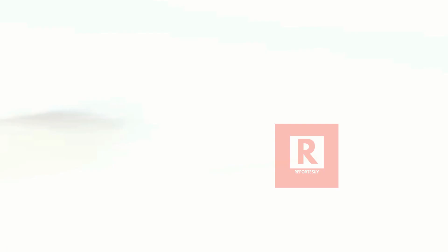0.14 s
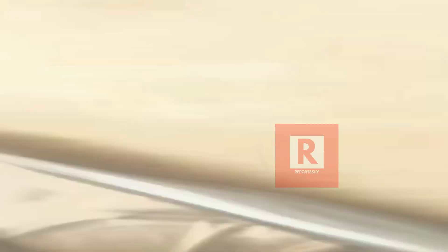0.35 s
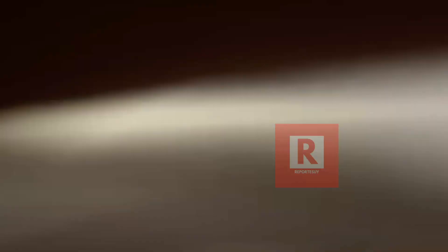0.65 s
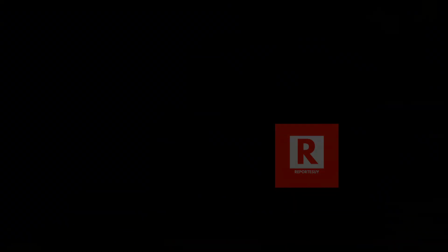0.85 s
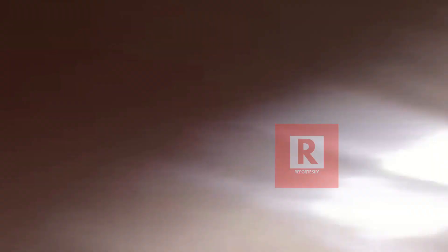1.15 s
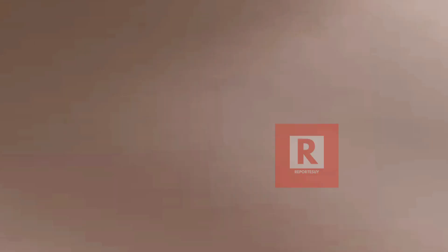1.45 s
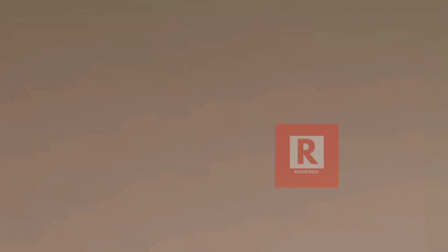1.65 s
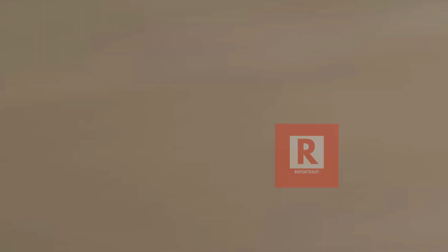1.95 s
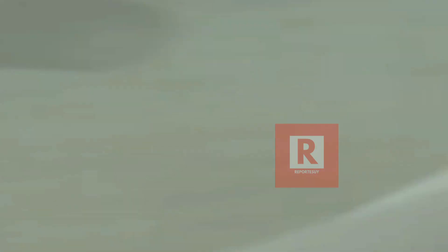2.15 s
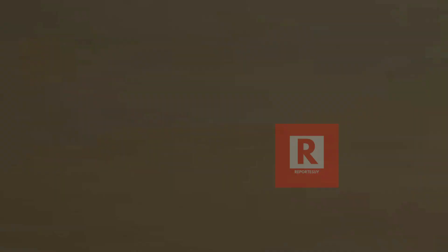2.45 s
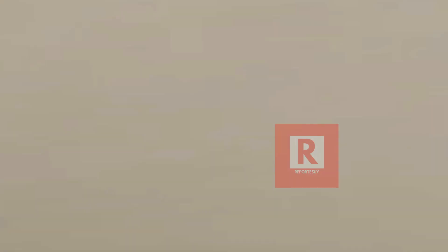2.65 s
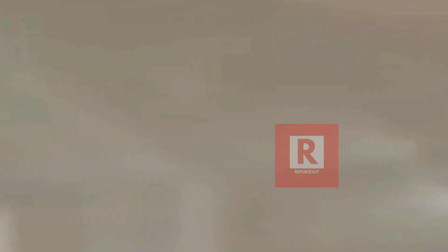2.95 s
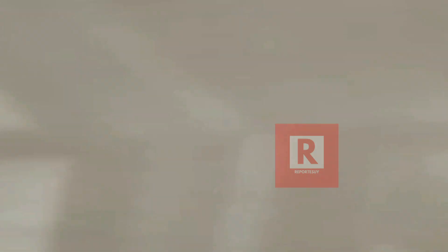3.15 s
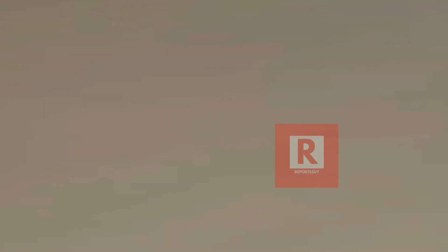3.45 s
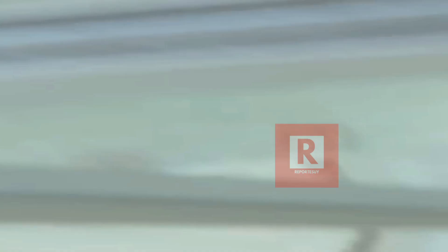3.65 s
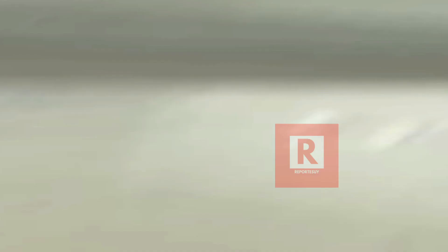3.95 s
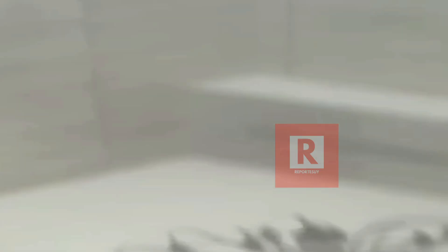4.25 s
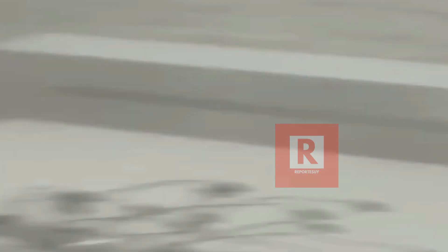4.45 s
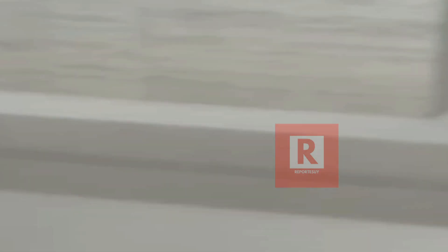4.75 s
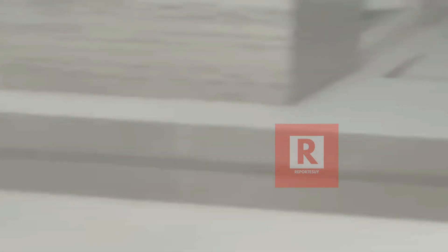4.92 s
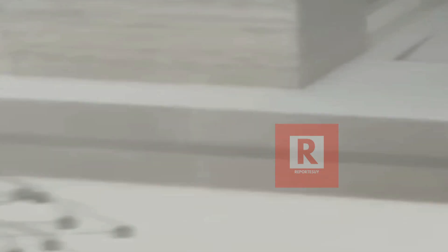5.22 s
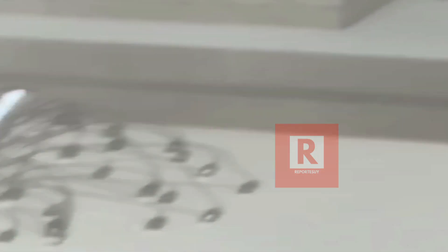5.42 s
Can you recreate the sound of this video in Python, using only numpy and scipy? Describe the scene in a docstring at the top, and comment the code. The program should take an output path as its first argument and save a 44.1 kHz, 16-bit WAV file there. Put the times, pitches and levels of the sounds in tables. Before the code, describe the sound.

The shock wave strikes a room without any lead-in, a flattened, distorted barrage of knocks, cracks and roaring crunch. Within a second it breaks into sliding rubble and hollow wind-like air; another collapse and few shards of glass follow before two seconds. Deep shaking lingers, with distant muffled knocks and a late small clatter near four and a half seconds. Wide stereo, bass centred, no extreme treble.

```python
"""Inside a building that a huge blast has just struck, heard in widened stereo.
Swaying room modes, noise echoes and damped knocks form the deep rumble, roar and crunch that die away.
Rubble, dust and hail are random impulses turned to coloured noise; heavy pieces are cracks with dying noise.
Glass shards ring as damped sines, air rushes past as opposed noise bands, and a faint hiss stays behind.
Left and right share part of the sound; the loudest peaks flatten and the extremes of pitch are cut."""
import sys
import numpy as np
from scipy import signal
from scipy.fft import rfft, irfft, next_fast_len
from scipy.io import wavfile

SR = 44100
rng = np.random.default_rng(int(sys.argv[2]) if len(sys.argv) > 2 else 0)


def transcribe(signal):
    """Save signal, clipped to [-1, 1], as a 16-bit WAV file at the path in sys.argv[1]."""
    frames = np.atleast_2d(signal).T
    limited = np.clip(frames, -1, 1)
    pcm = np.round(limited * 32767).astype(np.int16)
    wavfile.write(sys.argv[1], SR, pcm)


N = 246077
TIME_S = np.arange(N) / SR
RING_SIZE = 9000   # samples kept of each single impact


def from_db(db):
    """Logarithmic level: amplitude ratio of a level in decibels."""
    return 10 ** (np.asarray(db) / 20)


def rms_one(x):
    """Normalisation: scales a signal to unit mean power."""
    return x / np.sqrt(np.mean(x ** 2) + 1e-20)


def in_time(rows):
    """Linear interpolation: each column of a time table, one value a sample."""
    time_s, *columns = np.transpose(rows)
    return [np.interp(TIME_S, time_s, column) for column in columns]


def over_hz(rows, size):
    """Interpolation over log frequency: each column of a frequency table on an FFT grid."""
    freq_hz, *columns = np.transpose(rows)
    grid_hz = np.maximum(np.arange(size // 2 + 1) * SR / size, 1)
    return [np.interp(np.log(grid_hz), np.log(freq_hz), column) for column in columns]


def coloured(x, spectrum):
    """Linear filtering: multiplies the transform of x by a spectrum, then sets rms 1."""
    size = next_fast_len(N)
    gain = from_db(over_hz(spectrum, size)[0])
    return rms_one(irfft(rfft(x, size) * gain, size)[:, :N])


def drift(corner_hz):
    """Low-passed random process: noise through two equal poles wanders slowly with spread 1."""
    step = 40   # samples between slow values
    pole = np.exp(-2 * np.pi * corner_hz * step / SR)
    noise = rng.standard_normal(N // step + 2002)
    slow = signal.lfilter([1], [1, -2 * pole, pole * pole], noise)[2000:]   # settled part
    return np.interp(np.arange(N) / step, np.arange(len(slow)), rms_one(slow))


def echo_field(spectrum, lumpy_db, lump_hz):
    """Diffuse field: countless overlapping echoes act as lumpy noise, in two draws of one envelope."""
    noise = rng.standard_normal((2, N)) * from_db(lumpy_db * drift(lump_hz))
    return coloured(noise, spectrum)


def surge(start_s, level_db, rise_s, fall_db_per_s):
    """Energy build-up and decay: power of a sound that swells at its start and dies exponentially."""
    t = np.maximum(TIME_S - start_s, 0)
    return ((1 - np.exp(-t / rise_s)) * from_db(level_db - fall_db_per_s * t)) ** 2


# Heaps of rubble sliding down:
# start_s, roar_db, crunch_db, rubble_db, dust_db, fall_db_per_s
SLIDES = [(0.015, -15.5, -31, -42, -43, 167), (0.061, -23, -29, -36, -47, 198),
          (0.124, -32, -38, -29, -33.5, 79), (0.25, -29, -26, -25, -31.5, 63),
          (0.332, -12, -22, -28, -41, 85), (0.405, -16.5, -42, -27.5, -37, 152),
          (0.459, -24, -42, -30, -35.5, 50.5), (0.595, -15.5, -37, -54, -56, 162),
          (0.715, -27, -28, -36, -40, 156), (0.755, -24, -24.5, -32.5, -40.5, 155),
          (0.93, -26, -33.5, -42.5, -46, 103), (1.529, -29, -44, -47, -52, 91),
          (1.64, -30.5, -38, -40.5, -47, 57), (1.84, -27.5, -46, -69, -54, 99),
          (2.03, -31, -58, -49, -54, 67), (2.17, -43, -41, -44.5, -61, 70), (2.315, -37, -45, -47, -55, 43),
          (2.66, -60, -58.5, -47, -57.5, 68), (2.98, -41, -62, -75, -86, 59),
          (3.585, -59, -59, -62, -60, 122), (3.7, -51, -53, -57.5, -83, 46), (3.9, -57, -52, -58, -73, 27),
          (4.15, -61, -56, -59, -64, 28), (1.43, -31, -38, -53, -51, 66),
          (4.33, -48, -54.5, -57, -73, 43.5), (4.38, -35, -49.5, -60, -74, 100),
          (4.437, -35, -47, -54, -61, 87), (4.52, -48, -63.5, -62, -82, 65),
          (4.99, -60, -65, -50, -74, 117)]
SLIDE_RISE_S = 0.0081
COLLAPSE_S, COLLAPSE_RISE_S = 1.231, 0.003


def fade(rule, order):
    """Power addition: blast, collapse, floor and one column of the slides sum to a layer's gain."""
    blast_db, blast_fall, collapse_db, collapse_fall, floor_db, floor_fall = rule
    blast = from_db(blast_db - blast_fall * TIME_S) ** 2
    floor = from_db(floor_db - floor_fall * TIME_S) ** 2
    collapse = surge(COLLAPSE_S, collapse_db, COLLAPSE_RISE_S, collapse_fall)
    slides = sum(surge(s, levels_db[order], SLIDE_RISE_S, fall) for s, *levels_db, fall in SLIDES)
    return np.sqrt(blast + floor + collapse + slides)


# Brief dips and lifts of three bands: centre_s, half_width_s, low_mids_db, high_mids_db, treble_db
BAND_DIPS = [(0.113, 0.0069, 6, -5, -22.5), (0.218, 0.0033, -9, -11, 5), (0.245, 0.0046, -19, -12, 6),
             (0.396, 0.0032, -18, -14, -3), (0.43, 0.013, -6, -2.5, -3.5)]


def dips():
    """Amplitude modulation: bell-shaped level changes of low mids, high mids and treble."""
    level_db = 0
    for centre_s, half_width_s, *depths_db in BAND_DIPS:
        level_db = level_db + np.outer(depths_db, np.exp(-((TIME_S - centre_s) / half_width_s) ** 2))
    return from_db(level_db)


# Colour of the faint hiss that stays: freq_hz, gain_db
WASH_SPECTRUM = [(2000, -40), (4000, 4.5), (5300, 3.5), (6500, 0.5), (7500, -3), (8500, -8), (9200, -11.5),
                 (9700, -26), (10800, -41)]
WASH_DB = -62


def wash():
    """Stationary noise: a faint hiss whose mean level stays constant."""
    return from_db(WASH_DB) * echo_field(WASH_SPECTRUM, lumpy_db=.9, lump_hz=15.0)


# Air rushing past: time_s, low_rush_db, high_rush_db
RUSH_LEVELS = [(0, -49, -50), (.55, -41, -48), (.69, -38, -48), (.78, -29, -36), (.88, -34, -40),
               (.95, -32, -40), (1.06, -38, -46), (1.2, -52, -58), (1.42, -57, -55), (1.5, -38, -42),
               (1.55, -35, -38), (1.6, -40, -38), (1.72, -36, -31), (1.78, -32, -37), (1.84, -40, -42),
               (2.0, -49, -58), (2.5, -54, -69), (2.9, -49, -60), (3.5, -53, -61), (4.0, -54, -63),
               (4.38, -60, -68), (4.41, -47, -58), (4.5, -54.5, -65), (5.58, -60, -69.5)]
# Colours of its two bands: freq_hz, gain_db
LOW_RUSH_SPECTRUM = [(60, -48), (150, -17), (300, -1), (550, 1), (750, -3.5), (1300, -51)]
HIGH_RUSH_SPECTRUM = [(500, -38), (850, -5.5), (1060, 5), (1300, -6), (1600, -18.5), (2100, -49)]


def rush():
    """Opposite polarity: turbulent air in two hollow bands, left the inverse of right."""
    low_db, high_db = in_time(RUSH_LEVELS)
    low = echo_field(LOW_RUSH_SPECTRUM, lumpy_db=1.5, lump_hz=30.0)[0]
    high = echo_field(HIGH_RUSH_SPECTRUM, lumpy_db=2.5, lump_hz=40.0)[0]
    air = from_db(low_db) * low + from_db(high_db) * high
    return air * [[1], [-1]]


# Shards of glass clinking: start_s, level_db, pitch_hz, t60_s
GLASS_CLINKS = [(1.72, -39.5, 3640, 0.14), (1.72, -40, 8900, 0.1), (1.726, -44, 9100, .08),
                (1.72, -50, 8440, .05), (1.819, -57, 5830, 0.24), (2.325, -51, 8300, .16)]


def clinks():
    """Damped free vibration: each shard rings briefly at a pitch of its own."""
    out, t = np.zeros(N + RING_SIZE), np.arange(RING_SIZE) / SR
    for start_s, level_db, pitch_hz, t60_s in GLASS_CLINKS:
        start = round(start_s * SR)
        decay = from_db(level_db - 60 * t / t60_s)
        out[start:start + RING_SIZE] += decay * np.sin(2 * np.pi * pitch_hz * t)
    return out[:N]


# Power share of separate pieces: at rest, extra in the blast, and the time constant of its settling
GRIT_SHARE, GRIT_BLAST_SHARE, GRIT_SETTLE_S = .12, .5, .5


def patter(spectrum):
    """Shot noise: small pieces land in random clumps, over a smooth noise of pieces too many to tell apart."""
    per_s = 500 * from_db(4 * drift(15))
    born = rng.random(N) < per_s / SR
    sizes = born * from_db(3 * np.minimum(rng.exponential(1, N), 4))
    smear = np.exp(-np.arange(300) / (.001 * SR))   # each piece dies over about a millisecond
    puffs = rms_one(np.convolve(sizes, smear)[:N]) * rng.standard_normal((2, N))
    smooth = rng.standard_normal((2, N))
    share = GRIT_SHARE + GRIT_BLAST_SHARE * np.exp(-TIME_S / GRIT_SETTLE_S)
    return coloured(np.sqrt(share) * puffs + np.sqrt(1 - share) * smooth, spectrum)


# Colour of the dust: freq_hz, gain_db
DUST_SPECTRUM = [(2200, -58), (4400, 4.5), (5300, 6.5), (6500, 3.5), (8000, 1), (9500, 2), (11000, 0),
                 (11500, -6), (11900, -29.5)]
# blast_db, blast_fall_db_per_s, collapse_db, collapse_fall_db_per_s, floor_db, floor_fall_db_per_s
DUST_FADE = (-40, 12.5, -54, 9, -87.5, 0)


def dust():
    """Shot noise: the finest pieces fill the treble."""
    return fade(DUST_FADE, order=3) * patter(DUST_SPECTRUM)


# Colour of the rubble: freq_hz, gain_db
RUBBLE_SPECTRUM = [(600, -55.5), (1350, -2.5), (1800, -1.5), (2600, -3), (3700, -8.5), (4800, -16),
                   (9000, -55.5)]
# blast_db, blast_fall_db_per_s, collapse_db, collapse_fall_db_per_s, floor_db, floor_fall_db_per_s
RUBBLE_FADE = (-32.5, 15.5, -41, 14, -50, 1.23)


def rubble():
    """Shot noise: falling pieces patter in a band lower than the dust."""
    return fade(RUBBLE_FADE, order=2) * patter(RUBBLE_SPECTRUM)


# Heavy pieces landing: start_s, level_db, brightness_octaves above 1 kHz
HEAVY_CRASHES = [(0.0144, -18, 1.1), (0.0265, -16, 0.74), (0.1085, -18, 1.3), (0.1215, -15, .7),
                 (0.1379, -12.5, 1.2), (0.1634, -14, 1.6), (0.199, -21, 0.65), (0.2128, -9, 0.6),
                 (0.2336, -6, 0.8), (0.252, -6, 0.63), (0.26, -8.5, 1.24), (0.278, -5, 0.57),
                 (0.2887, -4, 0.6), (0.2972, -6, 0.39), (0.3445, -11, 1), (0.309, -11, 0.72),
                 (0.353, -15, 1.2), (0.389, -20, 0.85), (0.464, -10.5, 1.2), (0.4835, -11.5, 1.5),
                 (0.493, -15, 1.4), (0.5027, -7, 0.41), (0.5355, -17, .9), (0.606, -16, 0.4),
                 (0.651, -20, 1.4), (0.7218, -19, 0.5), (0.7552, -22, .9), (0.7745, -10.5, 0.51),
                 (0.9014, -32, 1.1), (0.9342, -23, 1.9), (1.071, -34, 0.46), (1.232, -26.5, 1.2),
                 (1.325, -32, 0.62), (1.389, -29, 0.64), (1.655, -31.5, 1.7), (1.777, -27, 1.0),
                 (2.19, -35, .6), (2.222, -34, .9), (2.33, -37, .7), (2.6793, -45, 0.88),
                 (3.5994, -45, 1.5), (4.427, -34, 0.5), (4.459, -34, .8), (5.0047, -32.5, 0.8),
                 (5.016, -41.5, .8)]
CRASH_T60_S = 0.009
CRACK_DB, CRACK_S = 3, 0.00032   # the hard first contact: level and time constant
FAR_S, FAR_CUT_HZ = 2.5, 6000   # later pieces land far off and sound duller


def crashes():
    """Impact excitation: a crack and a burst of dying noise, dull above the brightness of the piece."""
    out, t = np.zeros((2, N + RING_SIZE)), np.arange(RING_SIZE) / SR
    fall = from_db(-60 * t / .008) + from_db(-4 - 60 * t / CRASH_T60_S)
    crack = from_db(CRACK_DB) * np.exp(-t / CRACK_S) * [[1], [.5]]
    far = signal.butter(2, FAR_CUT_HZ, fs=SR, output="sos")
    for start_s, level_db, brightness_octaves in HEAVY_CRASHES:
        start = round(start_s * SR)
        band_hz = [500, 1000 * 2 ** brightness_octaves]
        band = signal.butter(1, band_hz, "band", fs=SR, output="sos")
        if start_s > FAR_S:
            band = np.vstack([band, far])
        noise = fall * rng.standard_normal((2, RING_SIZE))
        burst = signal.sosfilt(band, crack + noise)
        out[:, start:start + RING_SIZE] += from_db(level_db) * burst
    return out[:, :N]


# Colour of the fragments hammering the walls in the blast: freq_hz, gain_db
HAIL_SPECTRUM = [(150, -41.5), (350, -5.5), (600, 6), (950, -5.5), (1400, -9), (3000, -40.5)]
HAIL_PER_S, HAIL_DB, HAIL_FALL_DB_PER_S = 160, -20, 20.5


def hail():
    """Random impulse train: separate dull blows of uneven size, falling in level as the blast passes."""
    born = rng.random(N) < HAIL_PER_S / SR
    sizes = from_db(3 * np.minimum(rng.exponential(1, N), 3))
    blows = born * sizes * rng.choice([-1, 1], (2, N))
    return from_db(HAIL_DB - HAIL_FALL_DB_PER_S * TIME_S) * coloured(blows, HAIL_SPECTRUM)


# Colour of the crunch: freq_hz, gain_db
CRUNCH_SPECTRUM = [(300, -57.5), (620, -4.5), (800, -1), (1100, -4.5), (1450, -10), (3200, -49)]
# blast_db, blast_fall_db_per_s, collapse_db, collapse_fall_db_per_s, floor_db, floor_fall_db_per_s
CRUNCH_FADE = (-23.5, 13, -34.5, 9, -51, 0.8)


def crunch():
    """Diffuse decay: the upper-mid echoes of blast, collapse and slides."""
    return fade(CRUNCH_FADE, order=1) * echo_field(CRUNCH_SPECTRUM, lumpy_db=1.5, lump_hz=26.0)


# Colour of the roar: freq_hz, gain_db
ROAR_SPECTRUM = [(120, -52.5), (260, 4), (320, 2.5), (400, 0.5), (500, -2), (700, -9.5), (1400, -53)]
# blast_db, blast_fall_db_per_s, collapse_db, collapse_fall_db_per_s, floor_db, floor_fall_db_per_s
ROAR_FADE = (-16, 13.5, -33, 6, -41.5, 0.17)


def roar():
    """Diffuse decay: the low-mid echoes of blast, collapse and slides."""
    return fade(ROAR_FADE, order=0) * echo_field(ROAR_SPECTRUM, lumpy_db=2.0, lump_hz=31.5)


# Dull knocks through floor and walls: start_s, level_db, pitch_hz
KNOCKS = [(0.01, -8, 70), (0.023, -1.5, 377), (0.047, -18, 450), (0.087, -9, 600), (0.106, -1, 407),
          (0.122, -14, 75.3), (0.139, -0.5, 400), (0.167, -12, 454), (0.198, -6.5, 500), (0.211, -8.5, 700),
          (0.233, -6.5, 625), (0.262, -10, 330), (0.278, 0, 440), (0.297, -11, 473), (0.311, -11, 950),
          (0.342, -9.5, 480), (0.352, -9, 1000), (0.377, -9, 660), (0.5027, -13, 900), (0.049, -10.5, 796),
          (0.063, -8, 600), (0.363, -2.5, 322), (0.386, -8.5, 605), (0.416, -5, 397), (0.47, -12, 600),
          (0.605, -7.5, 870), (0.72, -6, 330), (0.755, -16, 487), (0.773, -16.5, 920), (0.935, -33, 395),
          (1.07, -26, 650), (1.358, -18, 264), (1.53, -14, 380), (1.547, -22, 450), (1.678, -17, 392),
          (1.854, -17, 368), (1.885, -18.5, 367), (2.314, -28, 365), (2.652, -35, 280), (0.182, -6.5, 95),
          (0.237, 0, 79), (0.512, -6.5, 74.6), (1.339, -15, 87), (1.49, -6.5, 87), (1.845, -8, 109),
          (1.882, -8, 111), (2.159, -7, 75), (2.244, -10, 93), (2.407, -17, 73), (2.496, -9.5, 75.6),
          (2.621, -23, 112), (2.733, -15.5, 105), (3.149, -15.5, 85), (3.6, -11, 80), (3.7, -16.5, 125),
          (3.785, -25, 81), (4.141, -23.5, 77.3), (4.28, -19.5, 75), (4.387, -20, 75), (4.403, -23, 253),
          (4.427, -35, 650), (4.4547, -10.5, 118), (4.464, -18, 282), (4.47, -15.5, 300),
          (4.4914, -10.5, 101), (4.524, -24, 308), (4.577, -23.5, 63), (4.679, -12.5, 120), (4.74, -26, 74),
          (5.098, -21, 92), (5.357, -19, 70)]
KNOCK_CYCLES = 8.8   # a knock dies by 60 dB in so many cycles


def thumps():
    """Constant damping per cycle: each knock is a short ring, the higher the shorter."""
    out, t = np.zeros(N + RING_SIZE), np.arange(RING_SIZE) / SR
    for start_s, level_db, pitch_hz in KNOCKS:
        start = round(start_s * SR)
        decay = from_db(level_db - 60 * t * pitch_hz / KNOCK_CYCLES)
        out[start:start + RING_SIZE] += decay * np.sin(2 * np.pi * pitch_hz * t)
    return out[:N] * [[1], [0]]   # only in the draw that left and right share


# Jolts that set the lowest room mode ringing: start_s, level_db
MODE_JOLTS = [(0.06, -11), (0.241, -9.5), (0.42, -13.5), (0.5, -10.5), (0.619, -11.5), (0.83, -8),
              (0.95, -14.5), (1.07, -26), (1.32, -25), (1.48, -11.5), (1.841, -27.5), (2.14, -19.5),
              (2.41, -20.5), (2.5, -21.5), (2.8, -24.5), (2.97, -24.5), (3.25, -36), (3.51, -27),
              (3.91, -31), (4.38, -26.5), (4.66, -27.5), (4.94, -27.5), (5.28, -31)]
JOLT_RISE_S, JOLT_FALL_DB_PER_S = 0.015, 65
SWAY_HZ, SWAY_WANDER_HZ, SWAY_REST_DB = 60.9, 3.5, -40


def sway():
    """Modal resonance: jolts drive the lowest room mode, its pitch and strength wandering."""
    phase = 2 * np.pi * np.cumsum(SWAY_HZ + SWAY_WANDER_HZ * drift(6.46)) / SR
    mode = rms_one(from_db(2.4 * drift(6.9)) * np.sin(phase))
    jolts = sum(surge(s, db, JOLT_RISE_S, JOLT_FALL_DB_PER_S) for s, db in MODE_JOLTS)
    return np.sqrt(jolts + from_db(SWAY_REST_DB) ** 2) * mode


# The structure shaking: time_s, boom_db, thud_db
RUMBLE_LEVELS = [(0.0, -16.5, -21.5), (0.06, -16, -13), (0.85, -26.5, -18), (1.02, -30, -25.5),
                 (1.1, -18, -22), (1.42, -22, -25), (1.49, -19, -19), (1.53, -19.5, -33.5),
                 (1.58, -21.5, -23.5), (1.75, -24, -26.5), (1.86, -19, -24.5), (2.07, -28, -27),
                 (2.2, -28.5, -28), (2.52, -18, -29.5), (2.57, -42.5, -35), (2.63, -23, -25),
                 (2.72, -43.5, -36), (2.76, -22.5, -28.5), (2.97, -26.5, -29.5), (3.81, -29, -29.5),
                 (4.33, -25.5, -31.5), (4.44, -27, -28.5), (5.02, -28, -29), (5.16, -23.5, -33),
                 (5.17, -30.5, -33), (5.56, -21, -31.5)]
# Colours of its two bands: freq_hz, gain_db
BOOM_SPECTRUM = [(12, -61), (22, -24), (30, -21.5), (42, 2.5), (52, -5), (61, 10), (72, -3), (85, 7.5),
                 (105, 2.5), (170, -76.5)]
THUD_SPECTRUM = [(50, -69), (90, -8), (125, 5), (165, -1.5), (205, -4), (250, -9), (320, -13.5), (600, -63)]


def rumble():
    """Structure-borne sound: two low noise bands follow the shaking, with the room mode and knocks."""
    boom_db, thud_db = in_time(RUMBLE_LEVELS)
    boom = from_db(boom_db) * echo_field(BOOM_SPECTRUM, lumpy_db=-1.0, lump_hz=7.5)
    thud = from_db(thud_db) * echo_field(THUD_SPECTRUM, lumpy_db=0.0, lump_hz=12.0)
    return boom + thud + sway() + thumps()


# Likeness and balance of left and right: freq_hz, likeness (0 to 1), left_minus_right_db
STEREO_LIKENESS = [(20, 1, 0), (70, 1, 0), (110, 1, 0), (145, .9997, 0), (200, .995, 0), (290, .96, .5),
                   (420, .9, .8), (600, .78, .9), (800, .65, 1.6), (1100, .62, .6), (1320, .8, .3),
                   (1550, .993, 0), (1750, .999, 0), (2050, .998, 0), (2300, .82, 0), (3100, .82, .5),
                   (3450, .999, 0), (4100, .998, 0), (4500, .75, 0), (4875, .99, 0), (5100, .8, 0),
                   (5300, .998, 0), (6300, .997, 0), (7200, .6, 0), (8500, .5, 0), (9700, .75, 0),
                   (10800, .97, 0), (12000, .99, 0)]
# Phase turn between left and right, which widens the stereo: freq_hz, left_lead_rad
STEREO_PHASE = [(20, 0), (2000, 0), (2200, .15), (2450, 1.1), (2800, 1.1), (3100, .3), (3450, 0), (4100, 0),
                (4250, .2), (4550, 1.3), (4875, 3.14), (5200, 6.283), (6200, 6.283), (8000, 7.4),
                (9800, 9.0), (10800, 9.42)]


def stereo(field):
    """Interchannel coherence: two draws mix into left and right by likeness, balance and phase turn."""
    size = next_fast_len(N + 2000)
    shared, differing = rfft(field, size)
    alike, lean_db = over_hz(STEREO_LIKENESS, size)
    lead_rad = over_hz(STEREO_PHASE, size)[0]
    turn = from_db(lean_db / 2) * np.exp(.5j * lead_rad)   # half to each side
    common = np.sqrt((1 + alike) / 2) * shared
    apart = np.sqrt((1 - alike) / 2) * differing
    return irfft(np.array([(common + apart) * turn, (common - apart) / turn]), size)[:, :N]


def scene():
    """Superposition: all sources add before the stereo widening, except the air rush, added after it."""
    low_mids, high_mids, treble = dips()
    field = wash() + clinks() + crashes() + rumble()
    field += treble * (dust() + rubble())
    field += high_mids * (hail() + crunch())
    field += low_mids * roar()
    return stereo(field) + rush()


CUTOFF_HZ = 12080


def record(dry):
    """Overload and band limits: the deepest lows are cut, the loudest peaks flatten, the top is cut."""
    dry = signal.sosfilt(signal.butter(1, 12, "high", fs=SR, output="sos"), dry)
    loud = dry / (1 + np.abs(dry) ** 8) ** (1 / 8)   # peaks stay below 1
    return signal.sosfilt(signal.cheby2(20, 50, 1.01 * CUTOFF_HZ, fs=SR, output="sos"), loud)


dry = scene()
out = record(dry)
transcribe(out)
```